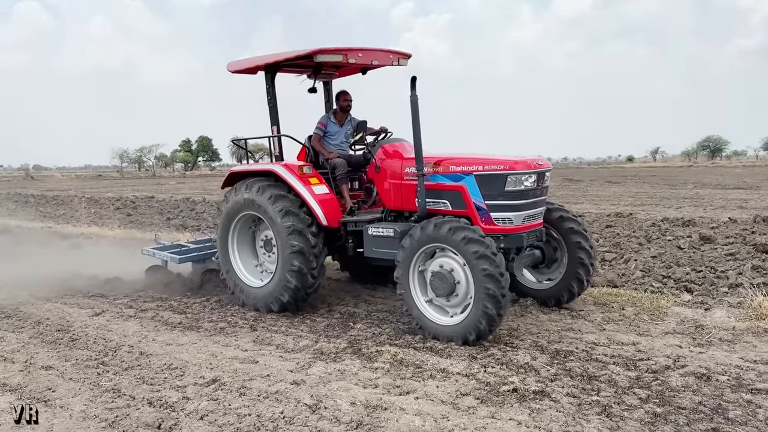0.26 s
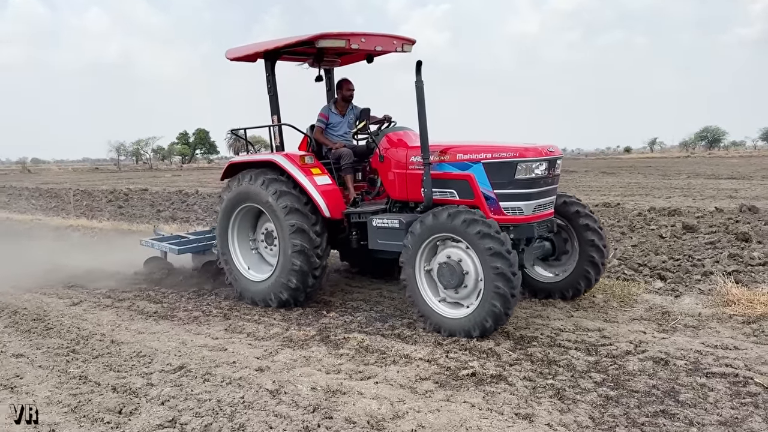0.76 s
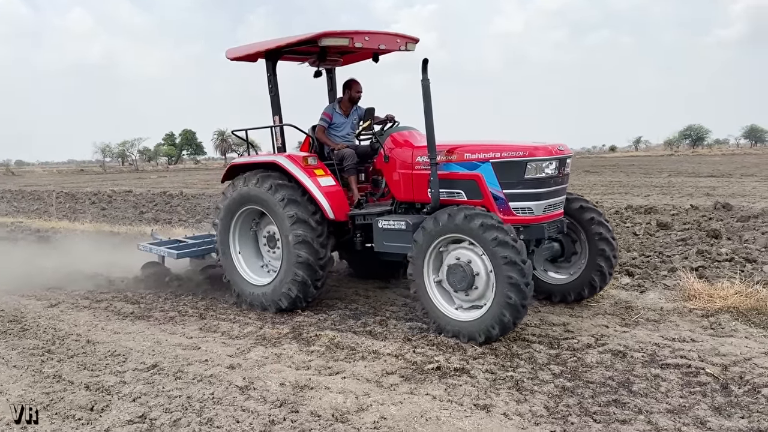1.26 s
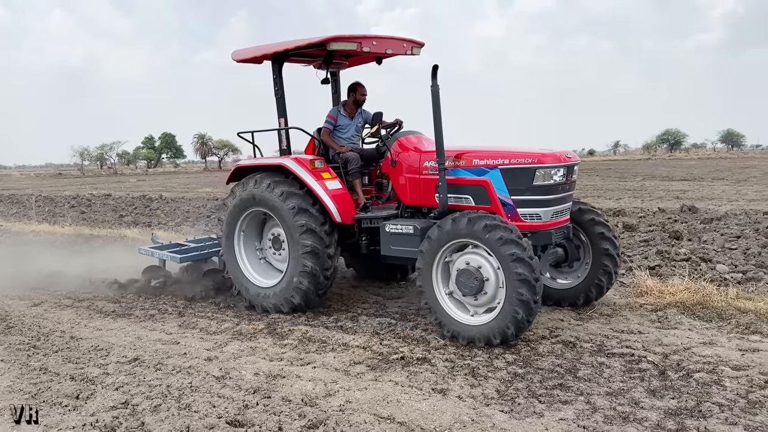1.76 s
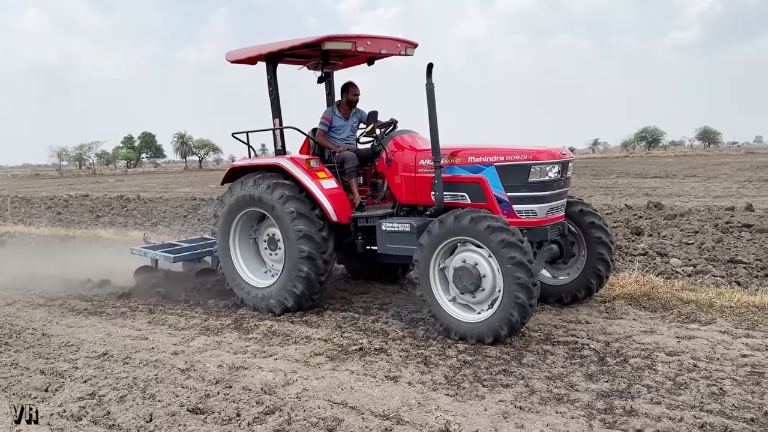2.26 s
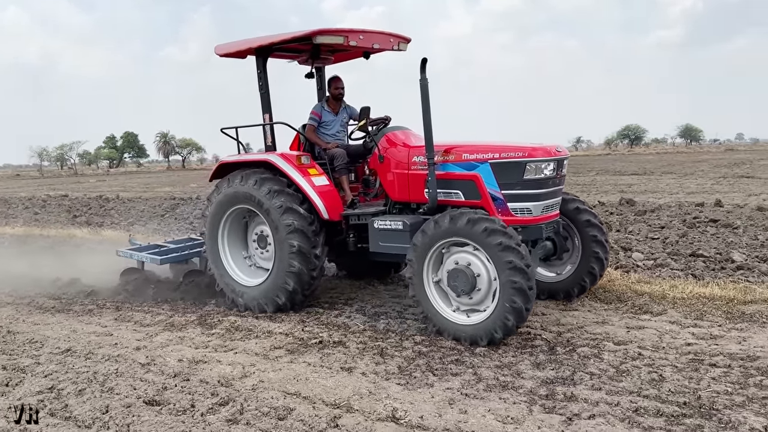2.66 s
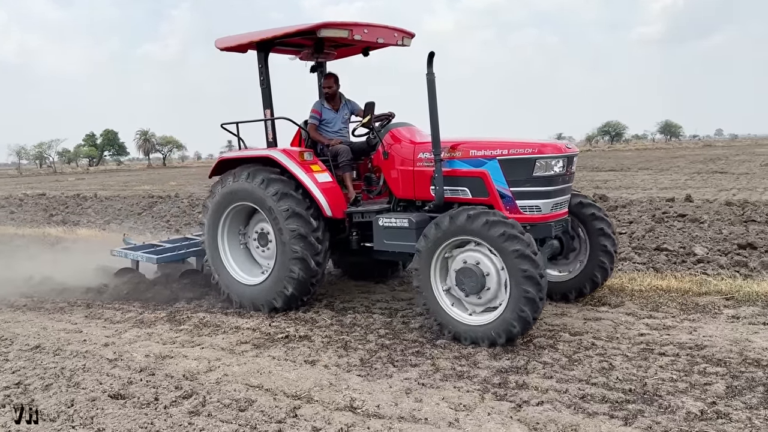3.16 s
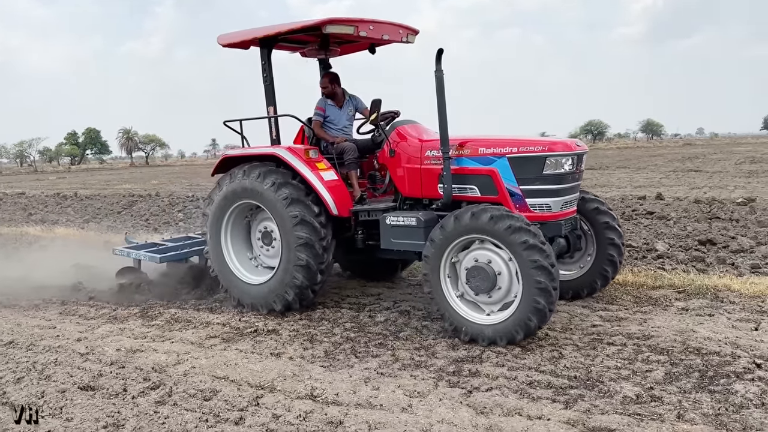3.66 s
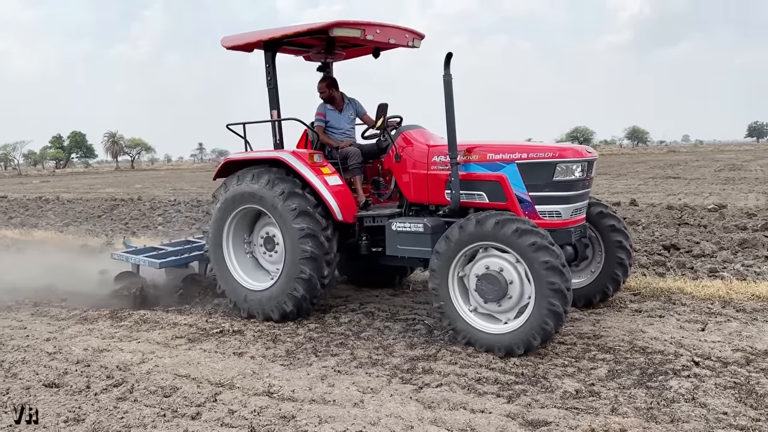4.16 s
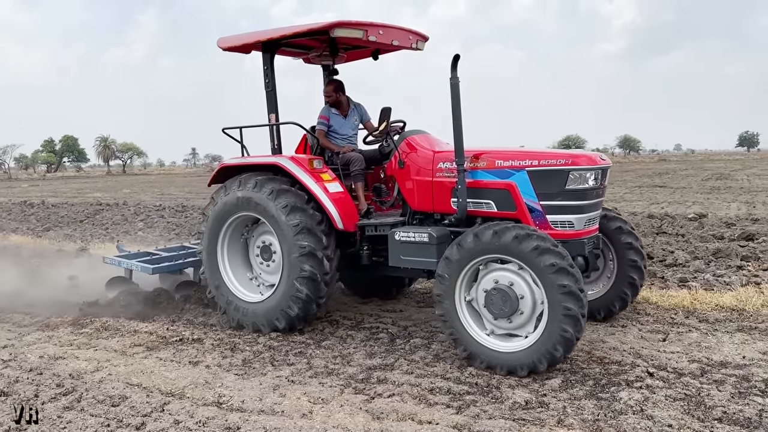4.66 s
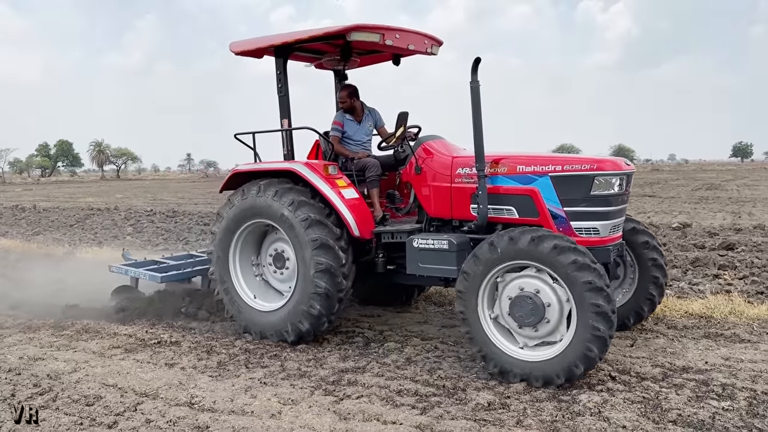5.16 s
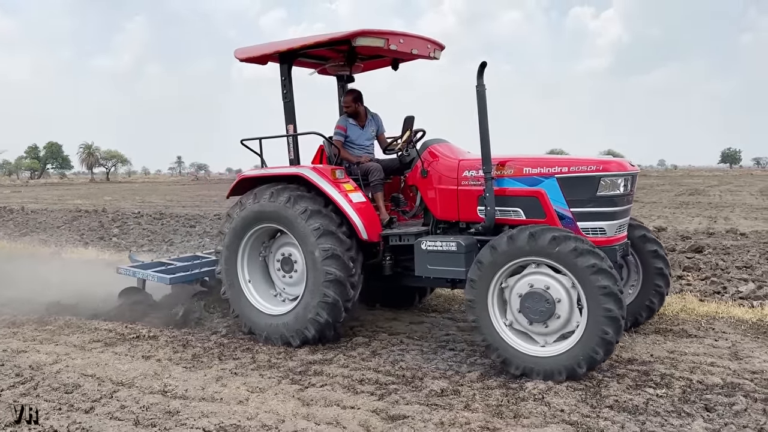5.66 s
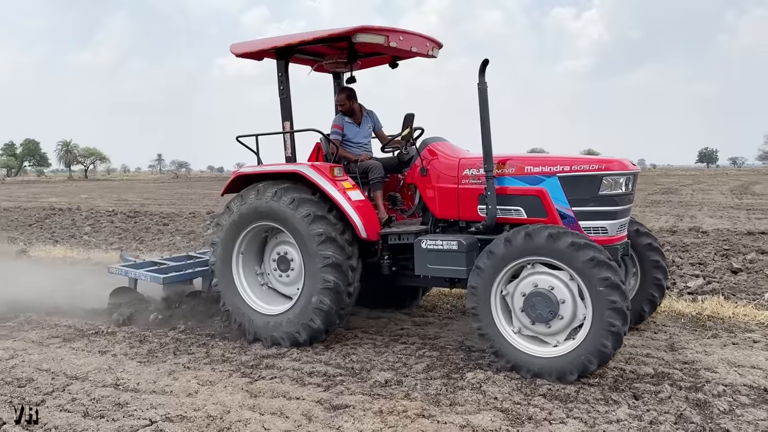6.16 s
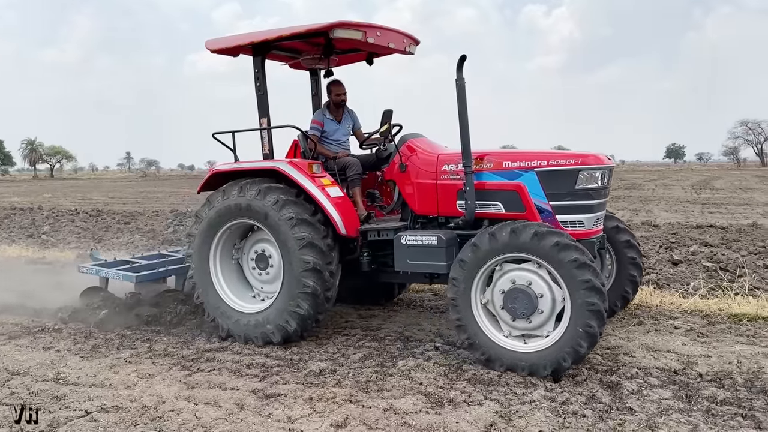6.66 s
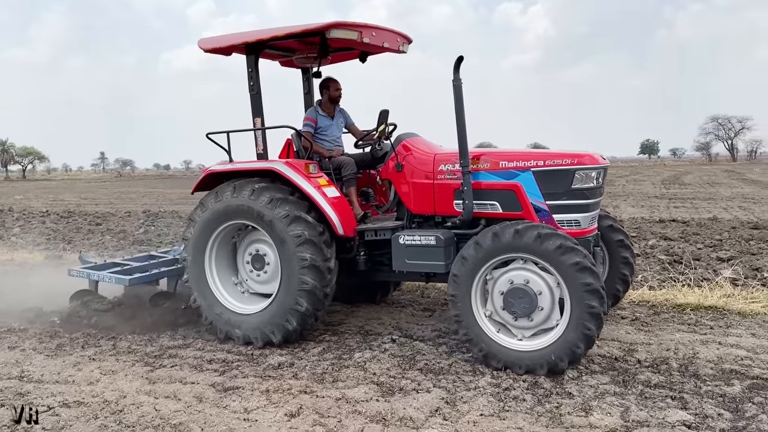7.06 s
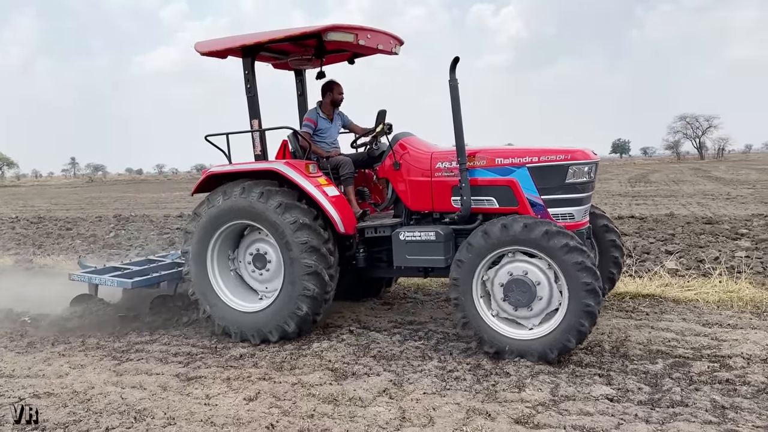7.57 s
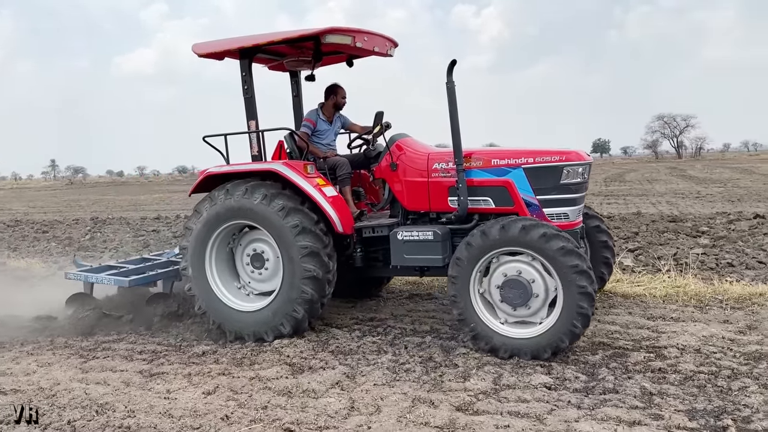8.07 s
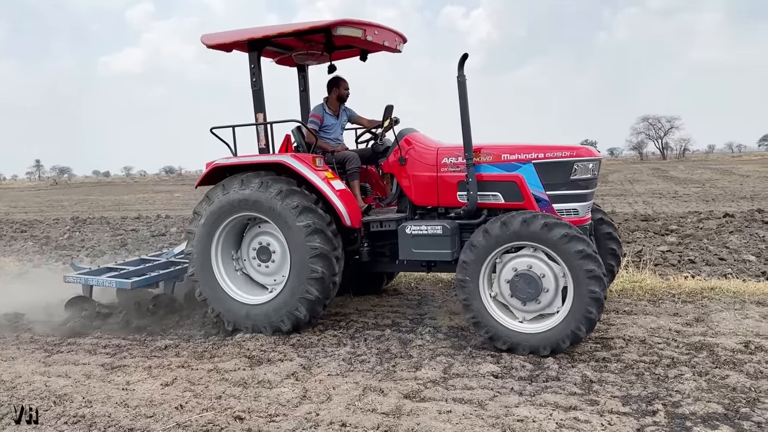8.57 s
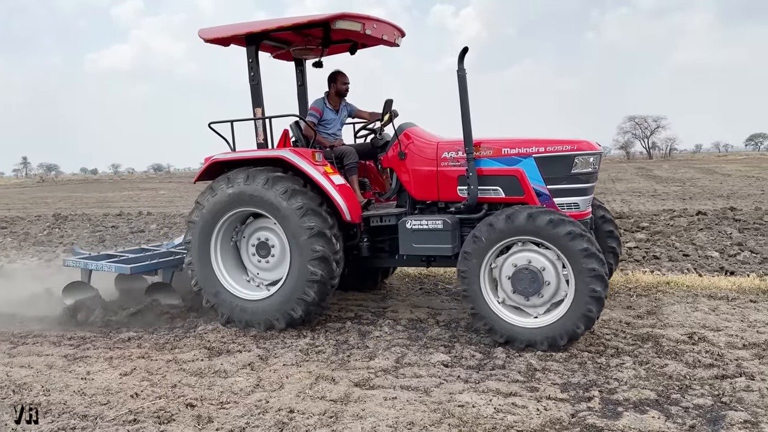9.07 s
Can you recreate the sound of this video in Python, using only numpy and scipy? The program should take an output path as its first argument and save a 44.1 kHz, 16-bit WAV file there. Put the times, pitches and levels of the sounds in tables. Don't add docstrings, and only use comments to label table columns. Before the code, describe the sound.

A diesel tractor pulls a disc harrow a few metres away in an open dry field. Rapid uneven knocks, around 33 a second, ride on a low exhaust drone that wavers as the load changes. Soil and fan hiss fills the gaps. A walking handheld stereo microphone catches gust after gust of low wind rumble, with the hardest slaps near the end.

```python
import sys
import numpy as np
from scipy import signal
from scipy.fft import rfft, irfft, next_fast_len
from scipy.io import wavfile
from scipy.ndimage import uniform_filter1d, map_coordinates

SR = 44100
rng = np.random.default_rng(int(sys.argv[2]) if len(sys.argv) > 2 else 0)


def persist_wave(psi):
    counts = np.round(np.clip(psi, -1, 1) * 32767).astype(np.int16)
    wavfile.write(sys.argv[1], SR, np.atleast_2d(counts).T)


def magnitude_from_level(level_db):
    exponent = np.asarray(level_db, float) / 20
    return 10 ** exponent


N = 411012
SIZE = next_fast_len(N + 4096)
HZ = np.maximum(np.arange(SIZE // 2 + 1) * SR / SIZE, 1.)

# time_s, firings_per_s
SHAFT = [(0.0, 33.46), (0.78, 32.5), (1.152, 33.41), (1.493, 32.13), (1.927, 33.73), (2.392, 31.93),
         (2.609, 33.19), (3.733, 33.12), (4.053, 31.96), (4.281, 33.2), (5.373, 32.04), (5.673, 31.29),
         (6.241, 33.33), (6.819, 30.97), (7.359, 33.62), (8.037, 30.64), (8.583, 33.66), (9.32, 30.85)]


def curves(table):
    s, *columns = np.transpose(table)
    return [np.interp(np.arange(N) / SR, s, c) for c in columns]


def on_log(table, hz):
    f, v = np.transpose(table)
    return np.interp(np.log(hz), np.log(np.maximum(f, 1)), v)


def unit(x):
    return x / np.sqrt(np.mean(x ** 2))


def walk(rate):
    hold = int(SR / rate)
    steps = np.repeat(rng.standard_normal(N // hold + 1), hold)
    return 1.41 * uniform_filter1d(uniform_filter1d(steps, hold), hold)[:N]


def filtered(x, response):
    return irfft(rfft(x, SIZE) * response, SIZE)[..., :N]


def resonance(hz, width):
    return 1 / (1 + 1j * (HZ - hz ** 2 / HZ) / width)


def gusts():
    # start_s, length_s, alike_at_start_db, alike_at_end_db, opposite_below_alike_db
    gust_table = [(0.05, .65, -16, -18, 13.5), (0.855, 0.063, -19, -16.5, 14), (1.2, 0.13, -25, -23.5, 15),
                  (1.69, 0.07, -23, -17.5, 12), (1.85, 0.2, -19.5, -21, 13), (2.18, .25, -18.5, -18, 13),
                  (2.53, 0.16, -17, -12.5, 16), (3.067, 0.64, -18.5, -22, 17), (3.702, 0.23, -36, -16, 19),
                  (4.077, 0.4, -13, -17, 11.5), (4.502, .15, -14.5, -16.5, 8),
                  (4.774, 0.31, -16.5, -15, 14), (5.38, 0.035, -21, -18, 9), (5.602, 0.42, -21, -19.5, 10),
                  (6.077, 0.085, -19.5, -18.5, 14), (6.38, .16, -15.5, -19, 16),
                  (6.655, 0.56, -18.5, -23, 13), (7.456, 0.057, -18, -20.5, 10),
                  (7.667, 0.21, -18, -15.5, 6), (8, .21, -14, -13, 11), (8.23, 0.09, -11, -11, 13),
                  (8.367, 0.15, -15, -12.5, 10), (8.581, 0.069, -11, -12.5, 11),
                  (8.688, 0.067, -12, -12.5, 9), (9.067, 0.23, -17, -16.5, 14)]
    calm_db, calm_split_db = -24, -36
    rise_db_s, fall_db_s = 133, 134
    t = np.arange(N) / SR
    both_db, split_db = np.full(N, calm_db, float), np.full(N, calm_split_db, float)
    for s, length, start_db, end_db, under_db in gust_table:
        times = [s - 1, s, s + length, s + length + 1]
        db = np.interp(t, times, [start_db - rise_db_s, start_db, end_db, end_db - fall_db_s])
        both_db = np.maximum(both_db, db)
        split_db = np.maximum(split_db, db - under_db)
    return both_db, split_db


def slaps():
    # start_s, peak_db, pitch_hz
    slap_table = [(2.668, 3, 82), (4.428, -3, 61.9), (4.499, -8, 96.9), (4.586, 3, 75.4), (4.999, -2, 64.6),
                  (7.469, -2, 91.5), (7.748, -1, 86.1), (7.915, -3, 91.5), (8.228, -1, 72.7),
                  (8.377, 9, 105), (8.531, -9, 63), (8.571, 1.5, 110), (8.63, -14, 67.3), (8.691, 5, 94)]
    t = np.arange(int(.05 * SR)) / SR - .017
    out = np.zeros(N)
    for s, db, hz in slap_table:
        start = int(s * SR)
        swing = np.sin(2 * np.pi * hz * t) * np.exp(-(t / 0.0049) ** 2)
        out[start:start + len(t)] -= magnitude_from_level(db - 7.0) * swing
    return out


def wind():
    # pitch_hz, level_db_per_hz
    eddy_spectrum = [(15, -47), (28, -40), (48, 0.5), (90, 1.5), (200, -8.5), (400, -25.5), (900, -41.5),
                     (2000, -73)]
    both_db, split_db = gusts()
    lump = walk(18)
    lumps = rfft(magnitude_from_level(2.3 * lump) * rng.standard_normal((2, N)), SIZE) * magnitude_from_level(on_log(eddy_spectrum, HZ))
    lumps[1] *= magnitude_from_level(0.4 * np.log2(HZ))
    both, split = map(unit, irfft(lumps, SIZE)[:, :N])
    flutter = magnitude_from_level(2.4 * lump + 1.9 * walk(30)) * rng.standard_normal(N)
    fine = unit(filtered(flutter, resonance(170, 200) ** 2))
    both = both * magnitude_from_level(both_db - 1.0) + fine * magnitude_from_level(1.935 * both_db + 2.0) + slaps()
    return both + magnitude_from_level(split_db) * split * np.array([[1], [-1]])


def over_soil(x):
    # time_s, notch_hz
    ground = [
        (0, 1530),
        (1.5, 1630),
        (2.4, 1590),
        (4.3, 1540),
        (5.3, 1620),
        (6.6, 1450),
        (8.2, 1350),
        (9.32, 1600),
    ]
    notch_hz = uniform_filter1d(curves(ground)[0], SR // 4)
    at = np.arange(N) - SR / (2 * notch_hz)
    echo = [map_coordinates(uniform_filter1d(v, size=7), [at], order=1) for v in x]
    return x + 0.21 * np.array(echo)


def shade(x):
    # pitch_hz, width_hz, depth_0_to_1, start_s, end_s
    shadows = [
        (785, 20, 0.8, -1, 2.1),
        (1073, 62, 0.83, 2, 4.7),
        (1450, 85, .55, 6.3, 9.5),
        (431, 28, 0.54, -1, 6),
    ]
    t, spectrum = np.arange(N) / SR, rfft(x, SIZE)
    for hz, width, depth, start, end in shadows:
        on = np.clip(np.minimum(t - start, end - t) / .2, 0, 1)
        x = x - depth * on * irfft(spectrum * resonance(hz, width), SIZE)[:, :N]
    return x


def two_ports(sound):
    # pitch_hz, left_lead_rad, left_minus_right_db, likeness_0_to_1
    ports = [(1, 0, .3, .95), (690, .2, 0, .93), (1030, .3, 4, .8), (2070, .1, 1.8, .71),
             (2900, 1.7, -1, .65), (3600, 1, 1.5, .48), (4100, 2.1, 2, .3), (4600, 5.6, 1.5, .55),
             (6000, 7, 2.8, .52), (7400, 7.9, 4, .5), (8300, 6.2, .3, .85), (9500, 4.95, 0, .72),
             (10450, 3.75, 0, .94), (11250, np.pi, 0, 1), (12150, 2.6, 0, .93), (12700, 1.2, 0, .72),
             (14200, 0, 0, 1), (15800, 0, 0, .95)]
    # pitch_hz, level_db_per_hz
    body = [(150, -11.5), (420, -12.5), (700, -12), (1350, -15), (1520, -20), (2000, -19.5), (2700, -23),
            (3000, -26.5), (4500, -26), (5500, -33.5), (8400, -40), (11000, -35.5), (13000, -40),
            (15800, -45)]
    at, *columns = np.transpose(ports)
    lead, left_db, like = (np.interp(HZ, at, c) for c in columns)
    port = magnitude_from_level(left_db / 2) * np.exp(.5j * lead)
    same, other = sound * magnitude_from_level(on_log(body, HZ)) * np.sqrt([(1 + like) / 2, (1 - like) / 2])
    return irfft([(same + other) * port, (same - other) / port], SIZE)[:, :N]


def exhaust(turn):
    # multiple_of_firing_rate, level_db
    firing_orders = [(1, -35), (2, -24.5), (3, -20), (4, -34), (5, -41.5), (6, -33), (7, -65), (9, -41.5),
                     (11, -45.5), (12, -50.5)]
    # time_s, level_db, tilt_db_per_octave
    puff = [(0, -2, -11), (.5, -0.5, -6.5), (1.15, -3.5, 0.5), (1.65, 3, 1), (2.1, -4, -5.5),
            (2.6, 0.5, -3), (3.3, -2.5, -1), (3.9, 0, 3), (4.4, -4, -5), (5.0, -0.5, -0.5),
            (5.7, 1.5, -1.5), (6.5, -2.5, -3), (7.0, 1.5, -2), (7.5, -3.5, -3), (8.15, 3.5, 2.5),
            (8.6, -6, 4), (8.85, -11, -2), (9.32, -27, -7)]
    lag = 0.545
    puff_db, tilt_db = curves(puff)
    out = 0
    for order, db in firing_orders:
        octaves = np.log2(np.clip(order, 2, 6) / 3)
        level = magnitude_from_level(db + puff_db + tilt_db * octaves + 1.93 * walk(7))
        out = out + level * np.sin(2 * np.pi * order * (turn - lag) + 0.069 * order * walk(5))
    return np.sqrt(2) * out


def marked_knocks(index, count):
    # time_s, peak_db
    hard = [(0.791, -13), (1.037, -11), (1.887, -13), (2.003, -7), (2.372, -17), (2.498, -10), (3.703, -21),
            (3.824, -12), (3.946, -11.5), (4.074, -17), (4.198, -2), (4.316, -3), (4.803, -7.5),
            (4.864, -6.5), (4.925, -11.5), (5.171, -15), (5.578, -10.5), (5.674, -13), (5.835, -15),
            (5.927, -11), (6.293, -9.5), (6.791, -13), (6.952, -6.5), (7.047, -17), (7.169, -10),
            (7.934, -15.5), (8.098, -7.5), (8.165, -13)]
    # time_s, peak_db
    ticks = [(0.0623, -26), (0.2119, -30), (0.8205, -21), (1.5504, -29), (1.6442, -29), (1.6741, -25),
             (3.9779, -28), (4.8319, -32), (5.5767, -25.5), (5.7059, -17), (6.8867, -26), (6.9187, -24),
             (6.9506, -23), (7.0459, -27), (7.0768, -16), (7.1392, -27), (7.6824, -19), (7.7443, -23),
             (7.8072, -30), (8.0641, -14.5), (8.097, -22), (8.1623, -22.5), (8.1933, -20), (8.3195, -18),
             (8.9251, -32), (9.0503, -21.5), (9.0823, -28), (9.176, -13), (9.2718, -13), (9.3033, -24)]
    heavy, bright = np.zeros((2, count))
    for extra, table in ((heavy, hard), (bright, ticks)):
        s, db = np.transpose(table)
        firing = index[((s + .004) * SR).astype(int)]
        extra[firing] = 4.5 + 0.41 * (db - db.mean())
    return heavy, bright


def spells(rows, db_s):
    t = np.arange(N) / SR
    return db_s * t + sum(db * np.exp(-((t - s) / half) ** 2) for s, half, db in rows)


def block(turn):
    cylinder_db = [-1.3, -2.1, 0.79, 0.16]
    # time_s, knock_db
    load = [(0, -0.5), (.6, -.5), (1, 0.5), (1.6, 0), (2.15, -0.5), (2.6, 1), (3, -0.5), (3.5, 0.5),
            (4.2, 0), (4.5, -0.5), (4.9, .5), (5.4, 0), (5.8, 1), (6.5, 0), (7, 1), (7.5, -1), (8.2, 0.5),
            (9.32, -0.5)]
    # pitch_hz, crack_share_db, crack_s, tail_s, steady_soil_and_fan_hiss_db, scatter_db
    knock_shape = [(200, -4.5, 0.009, 0.017, 2, 4.5), (750, 3.5, 0.0018, 0.0084, -12.5, 2),
                   (2160, -20, 0.0035, 0.01, -5.5, 0.5), (4350, 9, 0.0038, 0.009, -8.5, 3),
                   (8200, -42, 0.00077, 0.0087, -8, 2.5)]
    nearing_db_s = [0.24, 0.18, 0.073, 0.027]
    # pitch_hz, width_hz, level_db
    rings = [(563.4, 18, 3), (758.5, 19.6, -4.5), (1243, 57, 2.5), (4650, 420, -5.5), (1365, 60, -6.5),
             (470.3, 20, 0), (2653, 150, -0.5)]
    fading_db_s = [.3, -2.5, 0.081, 0.11, 0.45, 0.88, 0.24]
    # middle_s, half_length_s, level_db
    mode_spells = [
        [(.6, 0.12, -12), (1.6, 0.82, 2), (3.5, 0.13, -1.5), (5.6, 0.24, 10), (6.6, 0.31, 2), (8.1, 0.54, 1)],
        [(3.3, 0.69, 5), (5.8, 0.25, -14), (7.9, 0.33, 16)],
        [(3.1, 0.72, 4), (4.65, .25, 5.5), (5.5, 0.85, -7), (6.5, 0.12, 4.5), (7.5, 1.1, 1), (8.7, 0.24, -20)],
        [(0.1, .3, 15.5), (.95, 0.11, 17), (1.55, 0.12, 11), (2.1, 0.18, -15), (3.15, 0.65, 14),
         (4.2, 0.098, 13.5), (7.3, 0.39, 12.5), (8.3, 0.48, 13.5)],
        [(.8, 0.45, 5.5), (3.3, 1.0, 8), (5.4, 0.73, -10), (7.7, .9, 6)],
        [(.2, 0.33, 10), (4.5, 0.31, 2.5), (8.6, .7, 0)],
        [(3, .5, 2.5), (5, .6, 7.5), (7.5, 0.86, 4.5)],
    ]

    turn = turn + 0.27
    index = np.maximum(turn, 0).astype(int)
    count = index[-1] + 1
    chance = np.clip(rng.standard_normal((count, 47)), -2, 2)
    strength = np.array(cylinder_db)[np.arange(count) % 4] + 0.33 * chance[:, 1]
    heavy, bright = marked_knocks(index, count)
    chance[heavy + bright != 0] *= .4

    shape, shared_db = np.array(knock_shape), curves(load)[0]
    from_middle_s = (np.arange(N) - N / 2) / SR
    drifts = [magnitude_from_level(db_s * from_middle_s + shared_db + 0.41 * walk(3)) for db_s in nearing_db_s]
    clock = (turn % 1) / curves(SHAFT)[0] - .002 - 0.0011 * chance[index, 0]

    def rattle(hz, own, late):
        crack_db, crack_s, tail_s, hiss_db, scatter_db = (on_log(shape[:, [0, c]], hz) for c in range(1, 6))
        treble = np.interp(np.log2(hz / 1000), [.5, 2, 2.5, 3.5], [0, 1, 1, .55])
        marked_db = (1 - treble) * heavy + treble * bright
        size = magnitude_from_level(strength + marked_db + scatter_db * own)[index]
        since = np.maximum(clock - 0.0015 * late[index], 0)
        onset = np.clip(since / 0.0032, 0, 1)
        burst = onset * (magnitude_from_level(crack_db) * np.exp(-since / crack_s) + np.exp(-since / tail_s))
        drift = drifts[np.searchsorted([1450, 2950, 5200], hz)]
        return unit(size * burst + magnitude_from_level(hiss_db)) * drift * rng.standard_normal((2, N))

    sound = 0
    for k, hz in enumerate(180 * 2 ** np.arange(0, 6.6, .5)):
        own = 1.37 * chance[:, 2 + k] + 0.67 * chance[:, 3 + k]
        band = np.cos(np.pi * np.clip(np.log2(HZ / hz), -.5, .5))
        sound = sound + band * rfft(rattle(hz, own, chance[:, 24 + k]), SIZE)
    for k, (hz, width, db) in enumerate(rings):
        shake_db = spells(mode_spells[k], fading_db_s[k])
        level = magnitude_from_level(db + 1.14 * (shake_db - shake_db.mean()))
        drive = level * rattle(hz, 1.53 * chance[:, 16 + k], chance[:, 40 + k])
        sound = sound + resonance(hz, width) * rfft(drive, SIZE)

    spots = np.arange(0, SR / 2, 45.)
    forest = np.interp(HZ, spots, rng.standard_normal(len(spots)))
    sound = sound * magnitude_from_level(1.7 * forest * np.clip(HZ / 2000, 0, 1))
    return unit(two_ports(sound)) * magnitude_from_level(-25.0)


def scene():
    turn = -.249 + np.cumsum(curves(SHAFT)[0]) / SR
    return exhaust(turn) + over_soil(shade(block(turn))) + wind()


def band_limit(x):
    return signal.sosfilt(signal.butter(12, 15900, fs=SR, output="sos"), x)


def record(dry):
    low_pass = signal.ellip(10, .2, 80, 15850, fs=SR, output="sos")
    cut = signal.sosfilt(low_pass, np.clip(dry, -1, 1))
    return band_limit(cut)


dry = scene()
out = record(dry)
persist_wave(out)
```